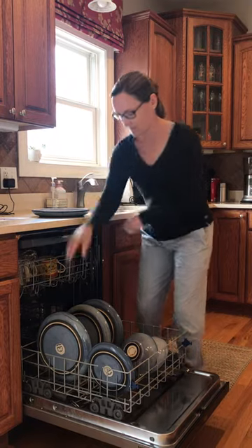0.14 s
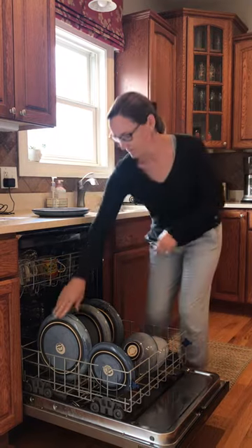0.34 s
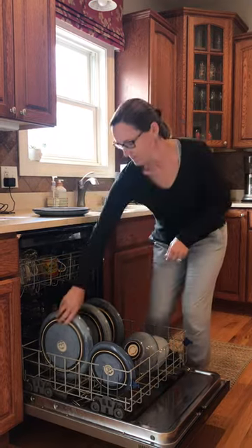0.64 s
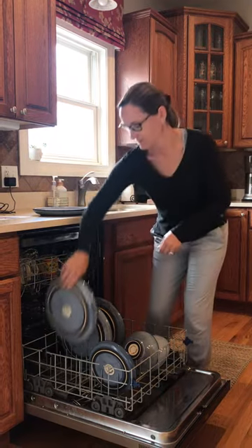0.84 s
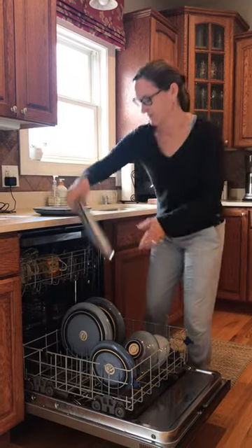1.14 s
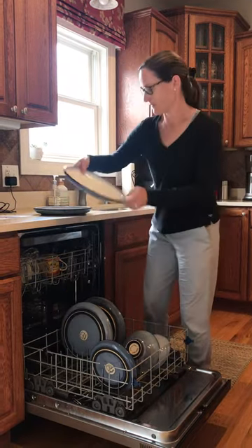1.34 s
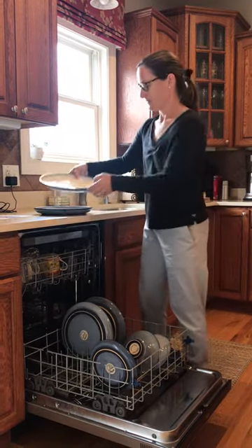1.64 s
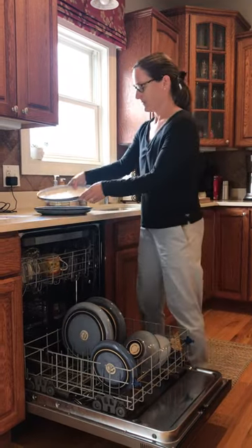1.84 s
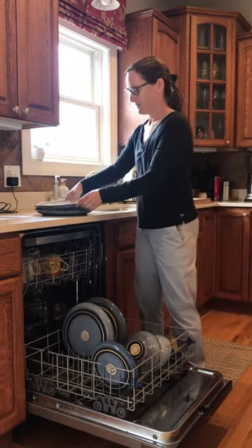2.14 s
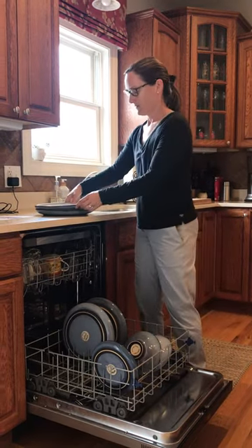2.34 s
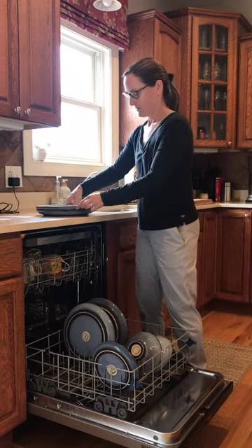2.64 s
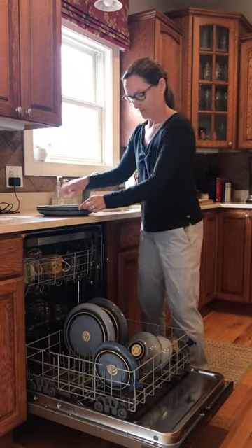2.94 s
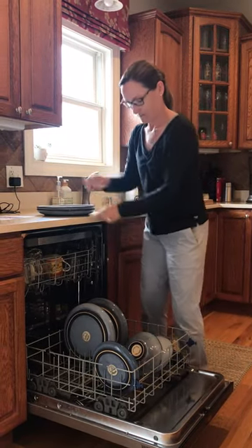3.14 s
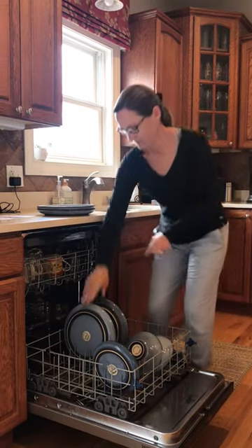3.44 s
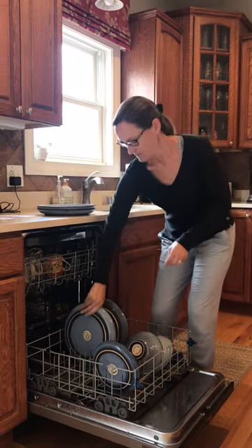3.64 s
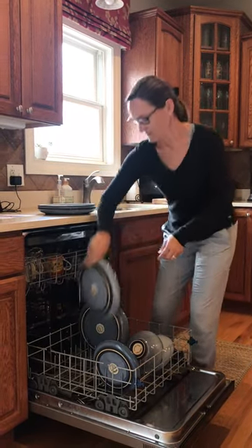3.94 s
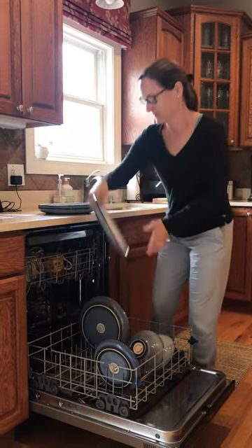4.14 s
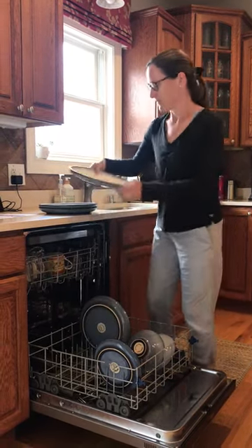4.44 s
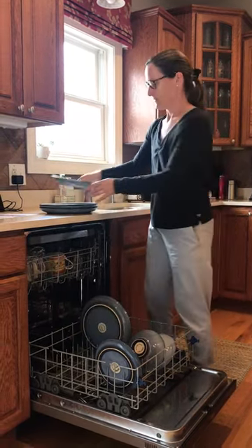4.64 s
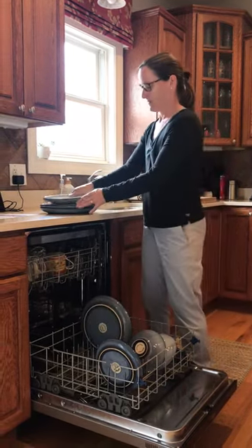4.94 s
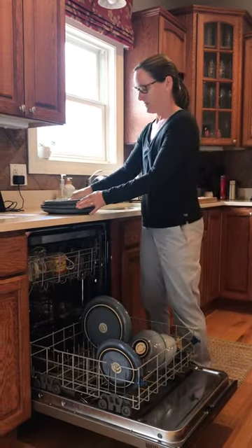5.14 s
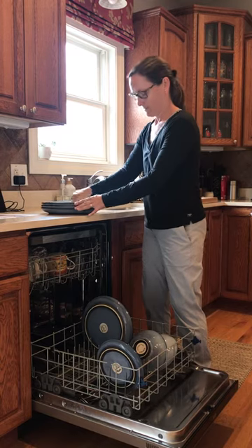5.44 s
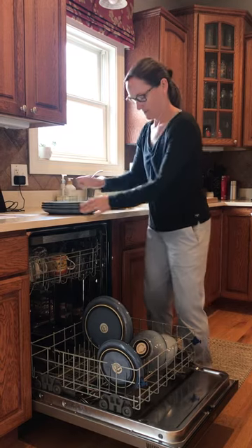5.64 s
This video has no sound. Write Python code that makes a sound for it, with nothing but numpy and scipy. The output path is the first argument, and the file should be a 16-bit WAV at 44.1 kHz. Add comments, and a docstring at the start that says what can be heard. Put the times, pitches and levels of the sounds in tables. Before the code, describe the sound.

In a small hard-walled kitchen, faint appliance hum and cloth rustle underlie soft clinks as a stoneware plate is pulled from a wire dishwasher rack. Fingers rub it lightly, then its edge hits a stack on the counter, slides and drops flat with a sharp clatter. A second plate repeats this, its rack clink a bit clearer and its landing quicker. Mono, moderately close, with short lively room reflections.

```python
"""Two plates from rack to stack

Two stoneware plates leave a dishwasher rack: each clinks against its neighbour, sings faintly under
the fingers, lands on one edge, slides and drops flat in a quick chatter on a stack on the counter.
Impacts excite damped modes and noise bursts; rubs excite the same bodies by random small slips.
A hard-walled kitchen answers through filtered decaying noise, over appliance hum, air and cloth."""
import sys
import numpy as np
from scipy import signal
from scipy.fft import rfft, irfft, next_fast_len
from scipy.io import wavfile

SR = 44100
rng = np.random.default_rng(int(sys.argv[2]) if len(sys.argv) > 2 else 0)


def transcribe(u):
    """Save the signal u as a 16-bit wav file named by the first command-line argument.

    u: samples, shape (n,) or (channels, n), limited to [-1, 1]; the rate is SR.
    q: integer samples, one column per channel.
    """
    v = np.clip(np.atleast_2d(u).T, -1, 1)
    q = np.round(v * 32767).astype(np.int16)
    wavfile.write(sys.argv[1], SR, q)


N = 254456  # samples in the scene
TAIL = 24576  # samples in one response
TOP_HZ = 15800
SWAP_S = 3.2  # the second plate is in hand from here on

# ringing modes of the two plates:
# (frequency [Hz], relative level [dB], t60 before sustain scaling [s])
FIRST_PLATE_MODES = [(915, -1.5, 0.22), (1358, -7, 0.078), (1564, -2, 0.12), (1640, -15, 0.16),
                     (2286, -3, 0.042), (2454, -5, 0.089), (2710, -6.5, 0.035), (2879, -4.5, 0.085),
                     (3170, -7.5, 0.038), (3394, -6.5, 0.22), (3493, -4.5, 0.15), (3784, -7, 0.039),
                     (4420, -12, 0.093), (4510, -13, 0.08), (5565, -14, 0.14), (6000, -10, 0.079),
                     (6540, -22, .12), (6640, -25, 0.086), (8350, -15, 0.075), (9900, -20.5, 0.077)]
SECOND_PLATE_MODES = [(991, 3, 0.27), (1390, -3.5, 0.2), (1550, -8, 0.022), (1654, 1.5, 0.16),
                      (2455, 2, 0.059), (2620, -11.5, 0.056), (2834, -12, 0.03), (2760, 1, 0.033),
                      (3320, -8, 0.03), (3537, -3.5, 0.031), (3840, -6, 0.039), (4770, -34, .12),
                      (5100, -11.5, 0.17), (6140, -13, 0.06), (6220, -13, 0.036), (8420, -21, 0.16)]


def plates(first_sustain, second_sustain):
    """Modal damping: a plate's grip or support scales the ring time of all its modes."""
    return body(FIRST_PLATE_MODES, first_sustain), body(SECOND_PLATE_MODES, second_sustain)


# modes of the stack before and after it has grown by a plate:
# (frequency [Hz], relative level [dB], t60 [s])
LOW_STACK_MODES = [(619, -9.5, 0.058), (656.4, -2, 0.061), (730, -23, 0.26), (990, -12, 0.093),
                   (1140, 0, 0.027), (1248, -8, 0.24), (1566, -7, 0.06), (1743, 1, 0.017),
                   (1762, -5, 0.031), (1958, -11.5, 0.23), (2537, -14, 0.22), (2830, -4, .1),
                   (2775, -9.5, 0.017), (6580, -14, 0.1), (6440, -32, 0.093)]
HIGH_STACK_MODES = [(480, -13.5, 0.49), (527, -10.5, 0.25), (595, -13.5, 0.028), (715, -18, 0.12),
                    (777, -13, 0.02), (892, -3, 0.023), (990, -47, 0.087), (1308, -4, 0.028),
                    (1513, -10, 0.22), (1717, -0.5, 0.048), (1670, -33, 0.13), (2140, -10.5, 0.1),
                    (2680, -38, .1), (2620, -8.5, 0.053), (3840, -11, 0.052), (3980, -11, 0.043),
                    (5100, -16, 0.091), (6380, -18, 0.066), (6560, -12, 0.047)]


def plate_stacks():
    """Modal resonance: the stack rings differently once it has grown."""
    return body(LOW_STACK_MODES), body(HIGH_STACK_MODES)


# clatters on the stack: (time of main blow [s], graze lead [s], first gap [s], loss per rebound [dB],
# plate before hardness [dB], stack before hardness [dB], dry clack before hardness [dB],
# thud [dB], crack [dB], brightness [dB])
STACK_CLATTERS = [(.003, 0.0013, 0.013, 9, -81, -65, -78, -65, -92, -5),
                  (2.324, 0.0027, .016, 3.2, -28.5, -29, -27.5, -38.5, -41, -0.5),
                  (2.532, 0.0013, .012, 8.4, -45, -47.5, -44, -48, -72, 0),
                  (2.7045, 0.0021, 0.013, 1.36, -35, -26, -26.5, -36.5, -53, 0),
                  (2.869, 0.00095, .012, 11, -55, -44.5, -41, -50, -65.5, 0),
                  (5.196, 0.001503, .007, 5.7, -22.5, -31, -26, -39.5, -46, .7),
                  (5.280, 0.0011, .007, 5.6, -43, -35, -30, -45, -68, -1.5),
                  (5.298, .006, .008, 5.5, -31, -32.5, -25.5, -41, -42.5, -.5),
                  (5.468, 0.00097, .006, 16, -40, -30, -31, -40.5, -45.5, -1),
                  (5.482, 0.00112, 0.012, 3.64, -35.5, -28.5, -26.5, -38, -61, 1)]
# colour of the counter's thud: (frequency [Hz], relative level [dB])
COUNTER_THUD = [(30, -51), (75, -8), (130, -11), (200, -2.5), (290, -4.5), (380, -7), (460, -5),
                (700, -29.5), (2000, -37)]


def stack_clatter(room, stacks):
    """Impact excitation: plates damped by the stack strike it, and the counter thuds."""
    landing = plates(first_sustain=0.75, second_sustain=0.6)
    return clatters(STACK_CLATTERS, room, landing, stacks, COUNTER_THUD, clack_t60=0.03, thud_t60=0.09)


# modes of the neighbouring plate with its wire seat:
# (frequency [Hz], relative level [dB], t60 [s])
SEATED_NEIGHBOUR_MODES = [(418, -2.5, 0.14), (446, -14.5, 0.25), (760, -32, 0.13), (1067, -13.5, 0.81),
                          (1417, -14.5, 1), (1497, -6, 1), (1635, -10, 0.47), (1750, -3, 0.044),
                          (2486, 4, 0.024), (2506, -5, 0.054), (2714, -2, 0.028), (3630, -11, 0.28),
                          (4025, -1, 0.024), (4117, -11.5, 0.44), (4780, -11, 0.061), (5020, -5.5, 0.028),
                          (6160, -16, 0.04), (6560, -9, 0.039), (8630, -15.5, 0.026), (14300, -36, 0.047)]
# clatters in the rack: (time of main blow [s], graze lead [s], first gap [s], loss per rebound [dB],
# plate before hardness [dB], neighbour with its seat before hardness [dB],
# dry clack before hardness [dB], thud [dB], crack [dB], brightness [dB])
RACK_CLATTERS = [(.720, 0.00089, .010, 11, -48.5, -46.5, -58, -50.5, -83, -2),
                 (.756, .010, 0.0085, 10.5, -44, -66, -47.5, -49.5, -66, -2),
                 (3.700, .001, .008, 5, -58, -43.5, -65, -46.5, -87, -2),
                 (3.721, 0.00197, 0.0066, 7, -49, -44, -64, -45, -74, -1.5),
                 (3.825, .003, .006, 3.5, -48.5, -37, -44.5, -51, -62, 2.5)]
# colour of the wire rack's thud: (frequency [Hz], relative level [dB])
RACK_THUD = [(60, -10), (150, -8.5), (232, 1.5), (300, -13), (400, -7.5), (520, -13.5), (700, -7),
             (1000, -18.5), (3000, -38)]


def rack_clatter(room, held):
    """Impact excitation: the held plate rings its neighbour with its wire seat, and the rack thuds."""
    seated_neighbour = body(SEATED_NEIGHBOUR_MODES)
    partners = seated_neighbour, seated_neighbour
    return clatters(RACK_CLATTERS, room, held, partners, RACK_THUD, clack_t60=0.011, thud_t60=0.39)


GRAZE_DB, GAP_SHRINK = -6.5, 0.9  # graze relative to the blow; ratio of successive gaps


def contacts(s, lead, gap, loss_db, count=5):
    """Inelastic rebound: a graze, the main blow, then rebounds ever sooner and softer, as (s, dB)."""
    k = np.arange(count)
    gaps = gap * GAP_SHRINK ** k
    times = s + np.cumsum(gaps) - gaps
    return [(s - lead, GRAZE_DB), *zip(times, -loss_db * k)]


# colour of the dry clack: (frequency [Hz], relative level [dB])
CLACK = [(100, -34.5), (480, -12.5), (620, 5.5), (950, 1), (1300, 2.5), (1800, 0.5), (2150, -8),
         (2700, -3.5), (3750, -7.5), (4500, -14), (6600, -13.5), (7600, -20.5), (12500, -33.5),
         (16000, -39)]
# colour of the sharp crack of glaze on glaze: (frequency [Hz], relative level [dB])
CRACK = [(2000, -40), (5000, -17), (8500, 7.5), (10000, -1.5), (12500, 3.5), (14500, -8.5), (16000, -7)]
CRACK_T60_S = 0.0069
# how harder contact tilts a blow: (frequency [Hz], gain per dB of brightness [dB])
HARDNESS = [(400, -2.5), (1900, -0.5), (6000, 1), (14000, 2.5)]


def clatters(rows, room, struck, partners, support, clack_t60, thud_t60):
    """Contact stiffness: harder blows ring both bodies brighter; the glaze cracks, the support thuds."""
    out = np.zeros(N + TAIL)
    tilt = causal(along(HARDNESS, bins(TAIL)))
    clack, hollow, glaze = colour_of(CLACK), colour_of(support), colour_of(CRACK)
    for s, lead, gap, loss_db, plate_db, partner_db, clack_db, thud_db, crack_db, bright_db in rows:
        turn = int(s > SWAP_S)
        hardness = np.exp(bright_db * tilt)
        for when, db in contacts(s, lead, gap, loss_db):
            path = somewhere(room)
            china = undb(plate_db) * ring(struck[turn], path)
            china += undb(partner_db) * ring(partners[turn], path)
            china += undb(clack_db) * burst(clack, clack_t60, path)
            thud = undb(thud_db) * burst(hollow, thud_t60, path)
            crack = undb(crack_db) * burst(glaze, CRACK_T60_S, path)
            add(out, when, undb(db) * (china * hardness + thud + crack))
    return out[:N]


# plates sliding home: (start [s], drop [s], at rest [s], level at the drop [dB])
SLIDES = [(2.41, 2.685, 2.90, -43), (5.34, 5.447, 5.70, -46)]
SLIDE_RISE_DB_PER_S, SLIDE_FALL_DB_PER_S = 37, 30


def slide(stack, room, start, drop, rest, db):
    """Sliding friction: the foot grinds harder over the stack until it drops flat, then eases to rest."""
    t = np.arange(N) / SR
    below_db = np.maximum(SLIDE_RISE_DB_PER_S * (drop - t), SLIDE_FALL_DB_PER_S * (t - drop))
    pressure = strokes([(start, rest - start, db)]) * undb(-below_db)
    touch = lambda: slip(stack, room, scrape_db=-0.5)
    return friction(touch, pressure, slips_per_s=250, spread_db=1.5)


# light ticks on the plate in hand:
# (time [s], ring before hardness [dB], dry tick before hardness [dB])
TAPS = [(.478, -66, -60.5), (.645, -60, -59), (1.025, -57, -62), (1.432, -63, -65), (1.602, -57.5, -65),
        (1.822, -60.5, -59.5), (2.06, -65, -70), (4.348, -61.5, -80), (4.405, -65, -74), (4.63, -63, -69),
        (4.805, -58.5, -60), (4.987, -62, -54.5)]
TAP_BRIGHT_DB, TAP_T60_S = 2, 0.024


def taps(held, room):
    """Impulse excitation: single light ticks ring the plate as it is gripped and turned."""
    out = np.zeros(N + TAIL)
    hardness = np.exp(TAP_BRIGHT_DB * causal(along(HARDNESS, bins(TAIL))))
    clack = colour_of(CLACK)
    for s, ring_db, tick_db in TAPS:
        path = somewhere(room)
        tap = undb(ring_db) * ring(held[int(s > SWAP_S)], path)
        tap += undb(tick_db) * burst(clack, TAP_T60_S, path)
        add(out, s, hardness * tap)
    return out[:N]


# fingers slipping on the glaze:
# (start [s], length [s], low ring [dB], high ring [dB])
RUBS = [(0.851, 0.2, -64, -59), (1.295, 0.064, -81, -66.5), (1.746, 0.26, -62, -65.5),
        (2.023, 0.042, -48, -66), (2.159, 0.16, -50.5, -65), (4.264, 0.25, -83, -70),
        (4.52, 0.2, -62.5, -63.5), (4.577, 0.038, -53, -59), (4.727, 0.06, -67, -55),
        (4.863, 0.51, -60, -61)]
SING_SPLIT_HZ = 1150


def handling(plate, room, turn):
    """Frictional excitation: fingers draw out the plate's lowest mode, gritty contact its higher ones."""
    rubs = [rub for rub in RUBS if int(rub[0] > SWAP_S) == turn]
    low = lambda: beyond(slip(plate, room, scrape_db=-12), SING_SPLIT_HZ, "low")
    high = lambda: beyond(slip(plate, room, scrape_db=-8), SING_SPLIT_HZ, "high")
    sing = strokes((s, length, db) for s, length, db, _ in rubs)
    grit = strokes((s, length, db) for s, length, _, db in rubs)
    singing = friction(low, sing, slips_per_s=900, spread_db=2.5, count=2)
    return singing + friction(high, grit, slips_per_s=300, spread_db=4.0, count=2)


# the first plate's rim scraping out over the tines: (start [s], length [s], level [dB])
TINE_SCRAPES = [(.915, .13, -56)]


def tines(plate, room, low_hz=3800):
    """Selective excitation: the rim drags over the rack's wires, exciting only the high modes."""
    touch = lambda: beyond(slip(plate, room, scrape_db=3), low_hz, "high", order=4)
    return friction(touch, strokes(TINE_SCRAPES), slips_per_s=97)


# modes of the wire seat: (frequency [Hz], relative level [dB], t60 [s])
RACK_SEAT_MODES = [(685, -2, 0.054), (955, -10, 0.076), (2500, -12, 0.064), (3520, -13.5, 0.056)]
# the first plate shifting in its seat: (start [s], length [s], level [dB])
SEAT_CREAKS = [(.55, 0.13, -58), (.635, 0.056, -59)]


def creak(room):
    """Frictional excitation: the plate's foot shifts in its wire seat as the hand takes hold."""
    touch = lambda: slip(body(RACK_SEAT_MODES), room, scrape_db=-11)
    return friction(touch, strokes(SEAT_CREAKS), slips_per_s=200, count=2)


def friction(touch, pressure, slips_per_s=300, spread_db=3, count=3):
    """Slip noise: tiny uneven slips at a few spots keep a body ringing; touch() sounds one spot."""
    out = 0
    for _ in range(count):
        response = touch()
        chance = rng.random(N) < slips_per_s / SR
        slips = rng.standard_normal(N) * chance * undb(spread_db * walk(60))
        response = response / np.linalg.norm(response)
        out = out + signal.oaconvolve(unit(slips) * pressure, response)[:N]
    return out / np.sqrt(count)


def slip(thing, room, scrape_db):
    """Impulse response: one tiny slip gives the object's ring and a dry tick."""
    path = somewhere(room)
    tick = burst(colour_of(CLACK), 0.004, path)
    return fade(irfft(ring(thing, path) + undb(scrape_db) * tick))


RUB_ATTACK_S, RUB_RELEASE_S = 0.0097, 0.015


def strokes(rows):
    """Amplitude envelope: rubs of (start s, length s, dB) swell, hold and die away alike."""
    t = np.arange(N) / SR
    total = 0
    for s, length, db in rows:
        attack = np.clip((t - s) / RUB_ATTACK_S, 0, 1)
        release = np.clip(1 - (t - s - length) / RUB_RELEASE_S, 0, 1)
        total = total + undb(db) * attack * release
    return total


def body(modes, sustain=1):
    """Modal superposition: resonance curves, their powers and normalised gains; sustain scales t60."""
    hz, db, t60 = np.transpose(modes)[:, :, None]
    f = bins(TAIL)
    width = np.log(1000) / np.pi / (t60 * sustain)  # bandwidth, Hz
    response = 1j * f * width / (hz ** 2 - f ** 2 + 1j * f * width)
    gain = undb(db[:, 0])
    return response, np.abs(response) ** 2, gain / np.linalg.norm(gain)


def ring(thing, path):
    """Modal participation: modes heard along a path, with random signs for where it is touched."""
    response, power, gain = thing
    sign = rng.choice([-1, 1], len(gain))
    level = strength(power @ np.abs(path) ** 2)
    return (sign * gain / level) @ response * path


def burst(colour, t60, path):
    """High modal density: a crowd of quickly damped modes acts as decaying noise along a path."""
    t = np.arange(TAIL // 4) / SR
    grit = rng.standard_normal(TAIL // 4) * np.exp(-np.log(1000) * t / t60)
    heard = (1 + rfft(grit / np.linalg.norm(grit), TAIL)) * colour * path
    return heard / strength(np.sum(np.abs(heard) ** 2))


# kitchen reverberation: (frequency [Hz], t60 [s])
KITCHEN_T60 = [(100, 0.87), (600, 0.37), (2500, 0.4), (6000, 0.31), (11000, 0.24), (16000, 0.3)]


def kitchen(direct_db=-7, early_db=-2, early_t60=0.072, count=6):
    """Reverberation: direct gain, and spectra of early echoes and a diffuse tail on a few paths."""
    t, hz = np.arange(TAIL) / SR, bins(TAIL)
    wash = rfft(rng.standard_normal((count, TAIL)))
    centres = np.geomspace(300, TOP_HZ, 7)
    tail = 0
    for f, share in zip(centres, np.eye(len(centres))):
        band = irfft(wash * along(np.c_[centres, share], hz))
        tail = tail + band * np.exp(-np.log(1000) * t / along(KITCHEN_T60, f))
    early = rng.laplace(size=(count, TAIL)) * np.exp(-np.log(1000) * t / early_t60)
    echoes = unit(tail) + undb(early_db) * unit(early)
    return undb(direct_db), rfft(echoes) / np.sqrt(TAIL)


def somewhere(room):
    """Source directivity: each contact radiates differently, with its own blend of the room's paths."""
    direct, echoes = room
    blend = rng.standard_normal(len(echoes))
    return direct + blend / np.linalg.norm(blend) @ echoes


# deep line of the hum, before its waver: (time [s], level [dB])
DRONE = [(0, -61), (.8, -60.5), (1.8, -62.5), (3.5, -75), (4.3, -66), (5.77, -64)]
DRONE_HZ = 51.4
# upper lines of the hum, before their waver: (frequency [Hz], level [dB])
HUM = [(94.7, -66), (129.4, -65), (156.2, -66.5), (206, -74.5), (229, -73.5)]
# colour of the room air: (frequency [Hz], relative level [dB])
AIR = [(15, -34), (25, -14), (78, -1), (137, 2.5), (439, -12.5), (1020, -15), (1160, -14.5), (1890, -18),
       (3720, -23.5), (4870, -27.5), (6210, -28), (10400, -41), (14800, -32), (16000, -45)]
AIR_DB = -61.5
# clothes swell on each stoop: (time of peak [s], level [dB])
STOOPS = [(.22, -72), (3.42, -73)]
STOOP_WIDTH_S, CLOTH_DB = 0.16, -73  # the cloth level holds throughout


def background(waver_db=3.5, drift=0.61):
    """Tonal and broadband noise: wavering appliance hum, room air and the soft hiss of cloth."""
    t = np.arange(N) / SR

    def tone(hz):
        """Slow modulation: a line drifts in phase (radians) and wavers in level."""
        line = np.sqrt(2) * np.sin(2 * np.pi * hz * t + drift * walk(1.15))
        return line * undb(waver_db * walk(0.895))

    hum = tone(DRONE_HZ) * curve(DRONE) + sum(undb(db) * tone(hz) for hz, db in HUM)
    stoops = sum(undb(db) * np.exp(-((t - s) / STOOP_WIDTH_S) ** 2) for s, db in STOOPS)
    hiss = noise([(200, -22), (1000, -0.5), (3500, 4.5), (8000, -1.5), (15000, -4.5)])
    cloth = hiss * (undb(CLOTH_DB) + stoops)
    return hum + cloth + undb(AIR_DB) * noise(AIR)


def noise(points):
    """Spectral shaping: steady noise of the given colour, at unit rms."""
    size = 2 * next_fast_len(N // 2 + 1, real=True)
    spectrum = rfft(rng.standard_normal(size)) * undb(along(points, bins(size)))
    return unit(irfft(spectrum))[:N]


def walk(rate):
    """Random modulation: interpolated Gaussian knots, rate per second."""
    knots = rng.standard_normal(int(N / SR * rate) + 2)
    return np.interp(np.arange(N) / SR * rate, np.arange(len(knots)), knots)


def undb(db):
    """Level law: decibels to amplitude gain."""
    return 10 ** (np.asarray(db) / 20)


def unit(x):
    """Normalisation: scale to rms 1."""
    return x / np.sqrt(np.mean(x ** 2))


def strength(power):
    """Energy equivalence: the rms a response would have if packed into 25 ms."""
    return np.sqrt(2 * power / TAIL / (0.025 * SR))


def curve(rows):
    """Level interpolation: gain over time from rows of (s, dB)."""
    return undb(np.interp(np.arange(N) / SR, *np.transpose(rows)))


def along(points, hz):
    """Logarithmic frequency: read (Hz, value) points on a log axis."""
    f, value = np.transpose(points)
    return np.interp(np.log(hz + 1), np.log(f), value)


def bins(size):
    """Discrete spectrum: frequencies in Hz for so many samples."""
    return np.arange(size // 2 + 1) * SR / size


def causal(db):
    """Minimum phase: log spectrum of the filter with this gain, so nothing sounds before the blow."""
    cepstrum = irfft(np.log(undb(db)))
    cepstrum[1:TAIL // 2] *= 2
    cepstrum[TAIL // 2 + 1:] = 0
    return rfft(cepstrum)


def colour_of(points):
    """Causal filtering: minimum-phase spectrum through (Hz, dB) points."""
    return np.exp(causal(along(points, bins(TAIL))))


def beyond(x, hz, side, order=6):
    """Band separation: keep what lies on the low or the high side of a frequency."""
    return signal.sosfilt(signal.butter(order, hz, side, fs=SR, output="sos"), x)


def fade(response):
    """Windowing: the last quarter of a response dies away to nothing."""
    return response * np.clip(np.linspace(4, 0, TAIL), 0, 1) ** 2


def add(out, s, spectrum):
    """Linear superposition: sound one contact at its moment."""
    start = max(int(s * SR), 0)
    out[start:start + TAIL] += fade(irfft(spectrum))


def scene():
    """Superposition: stack, rack, hands and room sound together."""
    room = kitchen()
    held = plates(first_sustain=0.9, second_sustain=1.3)
    stacks = plate_stacks()
    out = stack_clatter(room, stacks) + rack_clatter(room, held)
    for turn, (plate, stack) in enumerate(zip(held, stacks)):
        out += slide(stack, room, *SLIDES[turn])
        out += handling(plate, room, turn)
    out += taps(held, room) + tines(held[0], room) + creak(room)
    return (out + background())[None]


def record(dry):
    """Band limitation: a steep low-pass filter cuts the top."""
    return signal.sosfilt(signal.ellip(10, 0.2, 80, TOP_HZ, fs=SR, output="sos"), dry)


dry = scene()
out = record(dry)
transcribe(out)
```